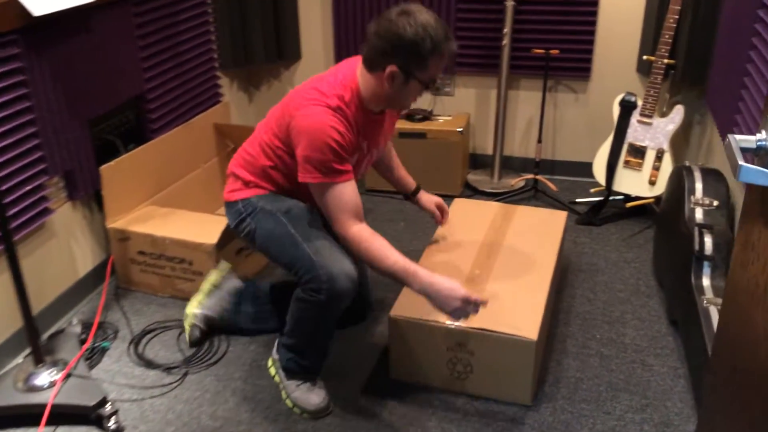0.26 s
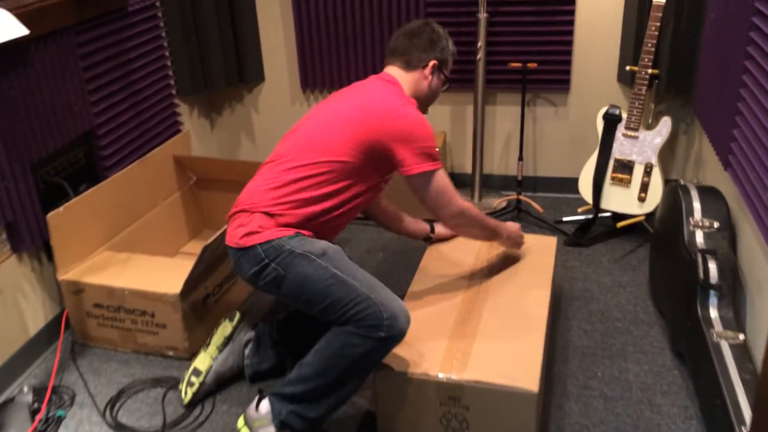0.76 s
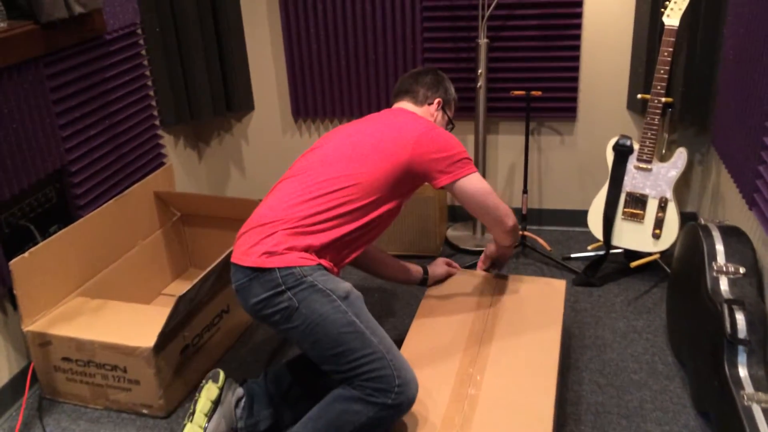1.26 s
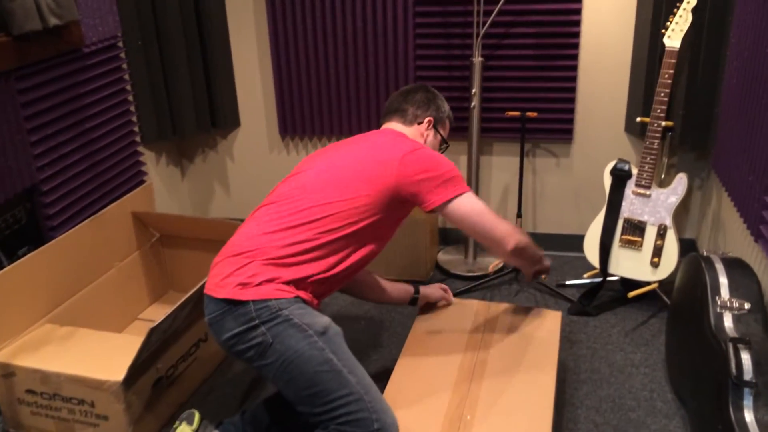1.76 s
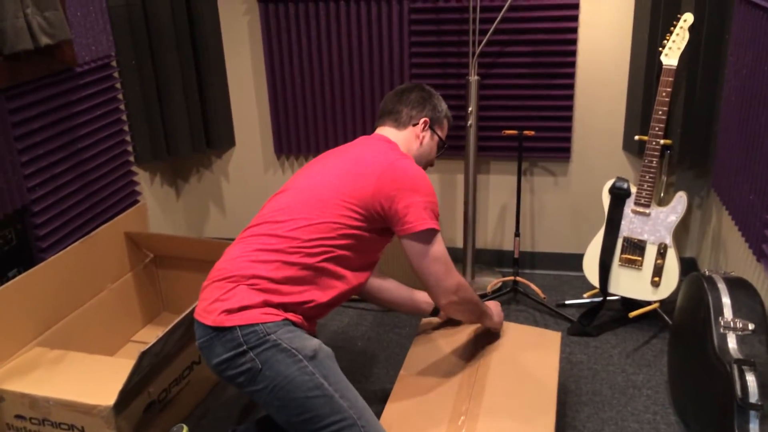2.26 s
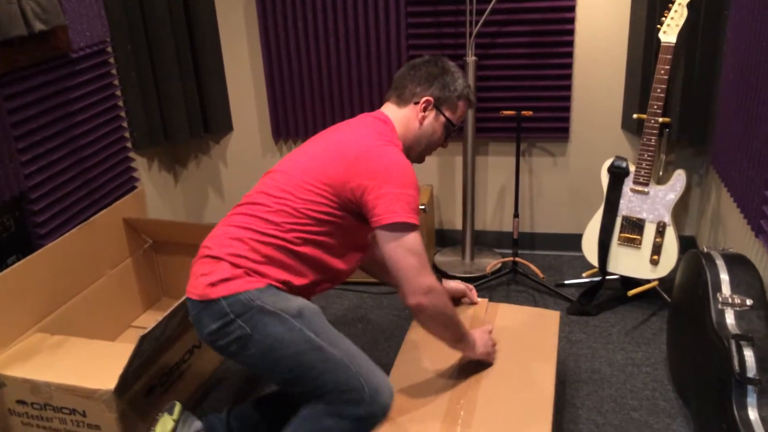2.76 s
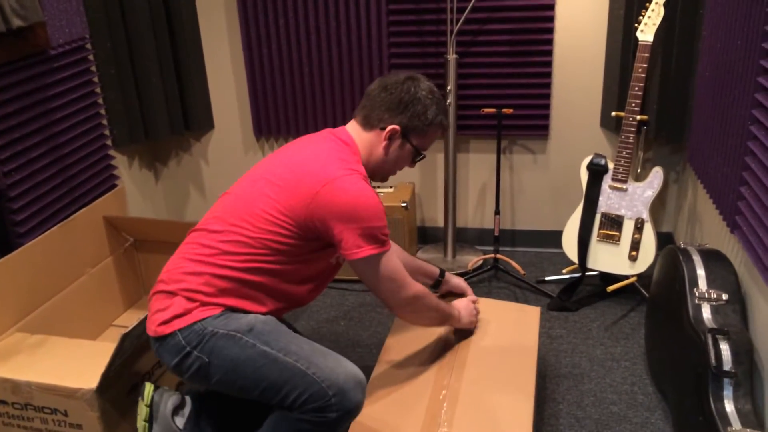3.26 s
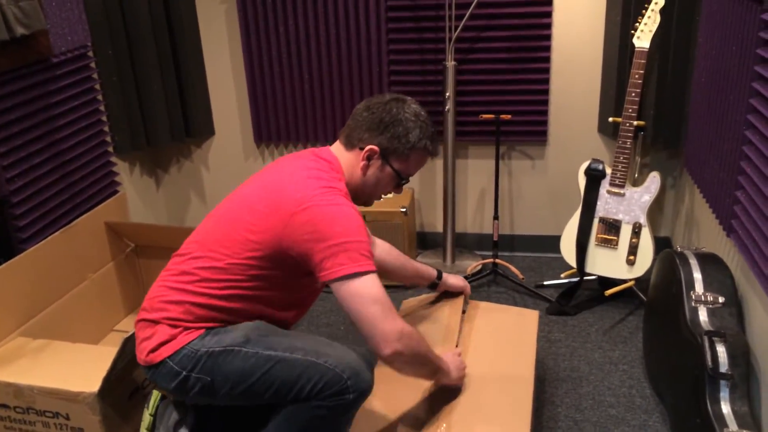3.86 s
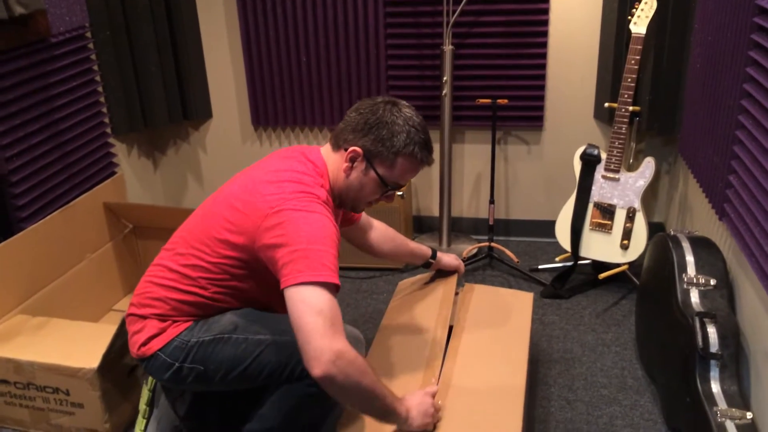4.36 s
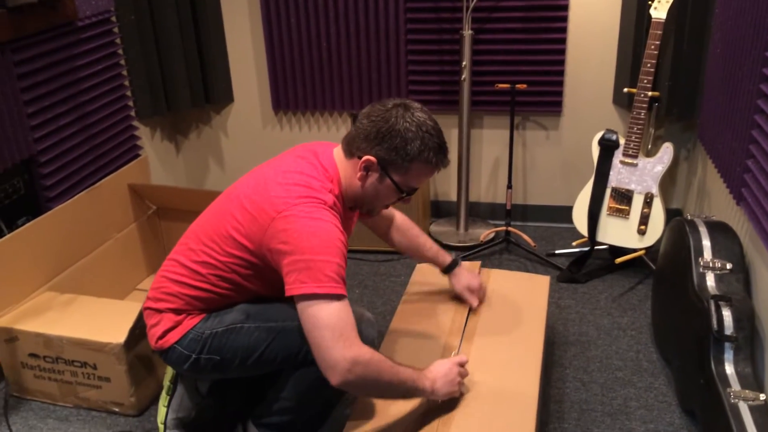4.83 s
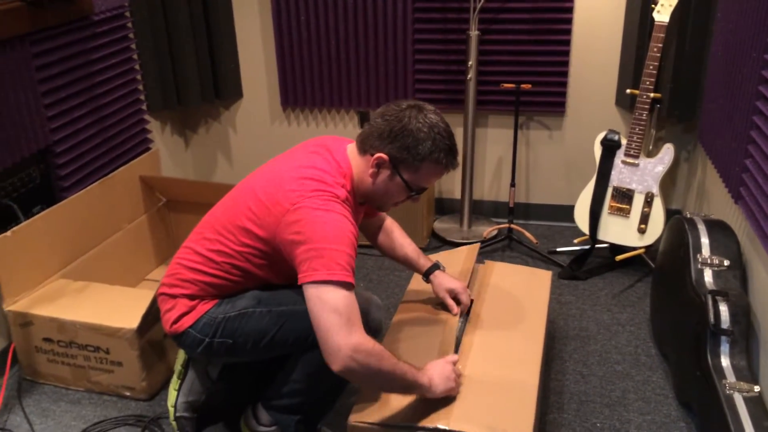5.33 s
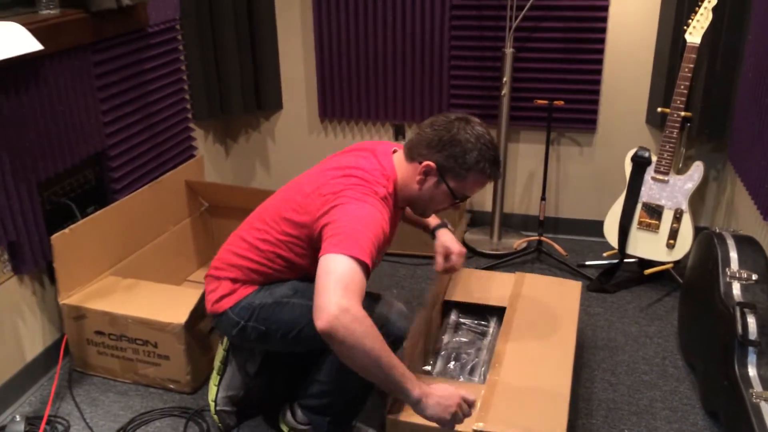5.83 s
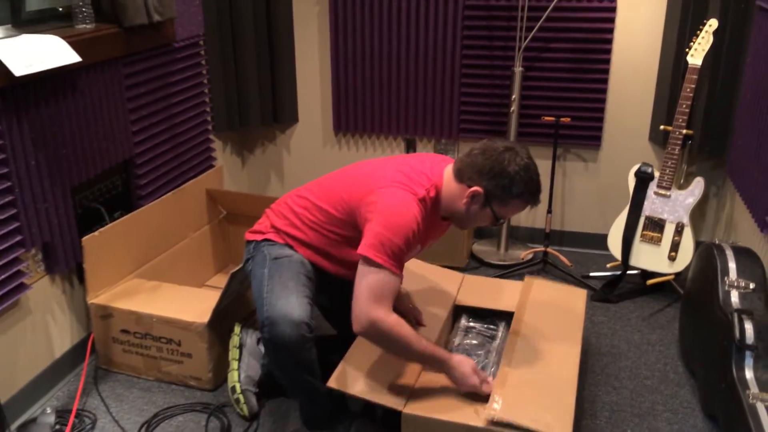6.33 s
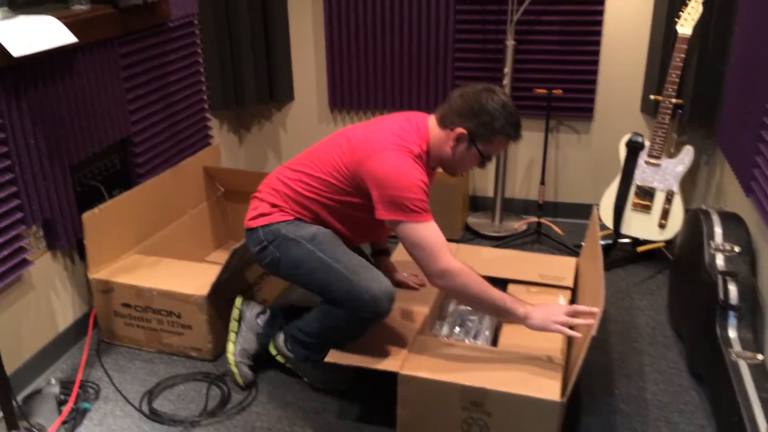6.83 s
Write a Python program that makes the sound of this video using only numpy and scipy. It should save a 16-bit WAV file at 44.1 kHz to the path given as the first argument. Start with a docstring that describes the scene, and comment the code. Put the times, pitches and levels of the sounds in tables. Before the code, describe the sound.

In a quiet padded room, packing tape snaps and scrapes under a knife before two hard pops and thumps open a cardboard carton.

```python
"""A cardboard box in a small, padded room: hands bump and stroke the board, then fibres and tape snap.
From 3.3 to 4.5 s a knife slits the taped seam; the flaps are then pulled open with hard snaps and pushes,
and strokes go on to the end. Snaps and scuffs are grain noise, rubbing is dense slips through resonances,
pushes are sagging sines in a hollow box and knocks are ringing board modes. A small microphone hears
the box over faint reflections and still air."""
import sys
import numpy as np
from scipy import signal
from scipy.fft import rfft, irfft
from scipy.io import wavfile

SR = 44100
rng = np.random.default_rng(int(sys.argv[2]) if len(sys.argv) > 2 else 0)


def wav_out(sig):
    """Save sig, one row per channel (or a flat mono array), as 16-bit PCM at SR to the path in sys.argv[1]."""
    wavfile.write(sys.argv[1], SR, np.round(np.clip(np.atleast_2d(sig).T, -1, 1) * 32767).astype(np.int16))


N = 312752

# resonances of the hollow box: mode_hz, width_hz, relative level_db
BOX_MODES = [(73, 20, -1), (127.4, 36.6, -1), (163, 16.6, -1.5), (187, 28.7, 1), (219, 57.4, -6.5)]
# resonances of the corrugated board: mode_hz, width_hz, relative level_db
BOARD_MODES = [(284, 88, 6.5), (434, 88, -2.5), (560, 380, -2.5), (686, 70, -6), (1026, 630, -10.5),
               (1380, 70, -11.5), (1400, 100, -13.5), (1810, 270, -12), (2300, 120, -16.5),
               (2640, 54, -21.5)]
SLIT_FROM_S, SLIT_TO_S = 3.33, 4.46   # the blade runs along the seam


def from_db(db):
    """Decibels to gain."""
    return 10 ** (np.asarray(db) / 20)


def rms_one(x):
    """Scales x to rms 1."""
    return x / np.sqrt(np.mean(x ** 2) + 1e-20)


def at_hz(points, hz):
    """Reads a table on a log-frequency axis."""
    points = np.array(points)
    return np.interp(np.log(hz), np.log(points[:, 0]), points[:, 1])


def drift(rate_hz):
    """Slow chance of spread 1: noise through a double one-pole low-pass."""
    r = np.exp(-2 * np.pi * rate_hz / SR)
    noise = rng.standard_normal(N + SR)
    return rms_one(signal.lfilter([1], [1, -2 * r, r * r], noise)[SR:])   # first second settles


def envelope(t, swell_s, t60_s):
    """Straight swell, then exponential decay."""
    swell = np.minimum(t / max(swell_s, 1e-4), 1)
    return swell * from_db(-60 * np.maximum(t - swell_s, 0) / max(t60_s, .01))


def colour(x, spectrum):
    """Shapes x by a spectrum; white noise of rms 1 keeps rms 1."""
    gain = from_db(at_hz(spectrum, np.linspace(1, SR / 2, N // 2 + 1)))
    return irfft(rfft(x) * rms_one(gain), N)


def resonate(x, modes, between_db):
    """Parallel resonances of alternating sign over a broad band; white noise of rms 1 keeps rms 1."""
    impulse = np.arange(N) == 0   # filtered alongside x to find the power gain
    probe = np.stack([x, impulse])
    edges_hz = [0.53 * modes[0][0], 1.16 * modes[-1][0]]
    band = signal.butter(2, edges_hz, "band", fs=SR, output="sos")
    out = from_db(between_db) * signal.sosfilt(band, probe)
    for k, (hz, width_hz, level_db) in enumerate(modes):
        r = np.exp(-np.pi * width_hz / SR)
        top = (-1) ** k * from_db(level_db) * (1 - r * r) / 2
        poles = [1, -2 * r * np.cos(2 * np.pi * hz / SR), r * r]
        out += signal.lfilter([top, 0, -top], poles, probe + 1e-18)
    return out[0] / np.sqrt(np.sum(out[1] ** 2))


def grains(per_s, spread_db):
    """Random tiny slips of uneven size and either sign; rms 1."""
    size_db = spread_db * np.minimum(rng.exponential(1, N), 5)
    sizes = from_db(size_db) * rng.choice([-1, 1], N)
    return rms_one(sizes * (rng.random(N) < per_s / SR))


def still_air():
    """The quiet room: coloured noise whose level drifts slightly."""
    # spectrum of the room tone: hz, relative level_db (per Hz)
    tone_spectrum = [(15, -8), (25, 12), (53, 8.5), (82, 6.5), (198, -7), (377, -9), (700, -14.5),
                     (868, -24), (1450, -16.5), (2110, -23.5), (7260, -25.5), (11500, -29.5), (15400, -28)]
    level_db = -59.5 + 0.27 * drift(3.0)
    return from_db(level_db) * colour(rng.standard_normal(N), tone_spectrum)


def room(x):
    """Dense reflections, each octave of noise dying at its own rate, the top ones soonest."""
    # decay of the padded room: hz, t60_s
    room_decay = [(100, 0.14), (1000, 0.15), (10000, 0.036)]
    t, tail = np.arange(SR // 2) / SR, 0
    for low_hz in 60 * 2. ** np.arange(8):
        band = signal.butter(2, [low_hz, 2 * low_hz], "band", fs=SR, output="sos")
        t60_s = at_hz(room_decay, np.sqrt(2) * low_hz)
        tail = tail + signal.sosfilt(band, rng.standard_normal(len(t))) * from_db(-60 * t / t60_s)
    tail = tail * (t > .004)   # reflections start 4 ms after the direct sound
    return signal.fftconvolve(x, tail / np.sqrt(np.sum(tail ** 2)))[:N]


def drumming():
    """The pushed panel swells and dies at its own sagging pitch; the whole box joins in."""
    # pushes that set a panel drumming: start_s, level_db (peak), panel_hz (at the start), t60_s
    push_table = [(0.207, -33, 132, 0.053), (0.223, -28, 172, 0.049), (0.464, -41, 69, 0.049),
                  (1.314, -37, 118, 0.038), (1.497, -26, 194, 0.086), (1.509, -23, 192, 0.062),
                  (1.548, -36, 184.4, 0.32), (1.635, -25, 200.3, 0.12), (1.825, -41.5, 183, 0.02),
                  (2.49, -22.5, 158, 0.1), (2.527, -34, 109, 0.1), (2.742, -38, 171.7, 0.39),
                  (2.807, -34.5, 168, 0.17), (2.86, -48, 168, 0.1), (2.933, -36.5, 129, 0.054),
                  (3.213, -42, 164, 0.18), (3.401, -26, 141, 0.028), (3.523, -30, 179, 0.031),
                  (3.569, -32.5, 168, 0.077), (3.753, -34.5, 209.6, 0.3), (3.809, -23.5, 194.2, 0.11),
                  (3.992, -35.5, 84, 0.081), (4.029, -42, 79.4, 0.17), (4.231, -38, 203, 0.062),
                  (4.275, -36, 204, 0.19), (4.892, -36.5, 226, 0.13), (5.041, -37.5, 219, 0.072),
                  (5.3, -33, 201, 0.25), (5.363, -18.5, 197.3, 0.061), (5.615, -14.5, 156.6, 0.12),
                  (5.628, -9, 174.7, 0.043), (5.665, -27.5, 130, 0.22), (5.946, -29, 172, 0.026),
                  (5.967, -31.5, 202, 0.02), (6.07, -34.5, 182.6, 0.11), (6.385, -39, 112, 0.21),
                  (6.42, -36, 113, 0.14), (6.549, -39, 137.6, 0.092)]
    swell_s = 0.0095
    panels, shake, t = np.zeros(N), np.zeros(N), np.arange(SR // 2) / SR
    for (start_s, level_db, panel_hz, t60_s), turn in zip(push_table, rng.random(len(push_table))):
        at = round(start_s * SR)
        rise = np.sin(np.pi / 2 * np.minimum(t / swell_s, 1)) ** 2
        decay = from_db(-60 * (np.maximum(t - swell_s, 0) / max(t60_s, .02)) ** 1.36)
        shape = from_db(level_db) * rise * decay
        cycles = panel_hz * t * (1 - 0.33 * t) + turn   # pitch sags by 66 % of its start per second
        panels[at:at + len(t)] += (shape * np.sin(2 * np.pi * cycles))[:N - at]
        shake[at:at + len(t)] += shape[:N - at]
    shake = shake * rng.standard_normal(N)
    hollow = from_db(-10) * resonate(shake, BOX_MODES, between_db=-15)
    flaps = from_db(-22.5) * resonate(shake, BOARD_MODES[:4], between_db=-27)   # they rattle along
    return panels + hollow + flaps


def knocks():
    """A short blow sets the board modes near its pitch ringing freely, the high ones dying first."""
    # knuckle or flap on the board: start_s, level_db (peak of the ringing), pitch_hz, t60_s (at that pitch)
    knock_table = [(0.211, -26.5, 920, 0.039), (6.275, -27.5, 432, 0.064)]
    out, t = np.zeros(N), np.arange(SR // 4) / SR
    start_turns = rng.random((len(knock_table), len(BOARD_MODES)))
    for (start_s, level_db, pitch_hz, t60_s), turns in zip(knock_table, start_turns):
        rings = np.zeros(len(t))
        for (hz, *_), turn in zip(BOARD_MODES, turns):
            gain = from_db(-9 * abs(np.log2(hz / pitch_hz)))   # 9 dB less per octave away
            ringing = envelope(t, .001, t60_s * pitch_hz / hz)
            rings += gain * ringing * np.sin(2 * np.pi * (hz * t + turn))
        click = 0.16 * envelope(t, 0.00018, 0.024) * rng.standard_normal(len(t))
        at = round(start_s * SR)
        out[at:at + len(t)] += from_db(level_db) * (rings / np.abs(rings).max() + click)
    return out


def pressure(now):
    """Each stroke is one arch of pressure; gains of hiss and scrape, strokes adding in power."""
    # blade and hands over the board: start_s, length_s, hiss_db (surface), scrape_db (board, over the hiss)
    stroke_table = [(-.06, 0.094, -47, -4), (0.259, 0.11, -67, 3), (0.332, 0.28, -70, 3),
                    (0.673, 0.4, -69.5, 3.5), (1.114, 0.49, -69.5, 2.5), (1.436, 0.27, -53, 1),
                    (1.81, 0.36, -63.5, -4), (2.078, 0.28, -67.5, 1), (2.477, 0.21, -51.5, -3),
                    (2.651, 0.15, -58.5, -2.5), (2.773, 0.3, -57, 2.5), (3.062, 0.49, -66, 1.5),
                    (3.34, 0.18, -63, 11), (3.62, 0.57, -55.5, 0.5), (3.954, 0.6, -53, -3),
                    (4.169, 0.21, -55.5, 7.5), (4.404, 0.32, -72, -1), (4.667, 0.63, -56.5, -6),
                    (5.13, 0.48, -66.5, 2.5), (5.383, 0.28, -49, -0.5), (5.646, 0.26, -66, -7),
                    (6.0, 0.29, -59, -3.5), (6.23, 0.6, -58.5, -3.5), (6.787, 0.24, -51, -3),
                    (6.908, 0.27, -50, -7)]
    peak_at, sharpness = 0.38, 0.92   # share of the length at full pressure; power of the arch
    hiss, scrape = np.zeros(N), np.zeros(N)
    bend = np.log(.5) / np.log(peak_at)
    for start_s, length_s, hiss_db, scrape_db in stroke_table:
        progress = np.clip((now - start_s) / length_s, 0, 1)
        arch = np.abs(np.sin(np.pi * progress ** bend)) ** sharpness
        hiss += (from_db(hiss_db) * arch) ** 2
        scrape += (from_db(hiss_db + scrape_db) * arch) ** 2
    return np.sqrt(hiss), np.sqrt(scrape)


def wandering(x, modes, between_db):
    """Resonances that each swell and fade on their own while the contact point travels."""
    power = sum(width_hz * from_db(2 * level_db) for _, width_hz, level_db in modes)
    voices = np.zeros(N)
    for mode in modes:
        _, width_hz, level_db = mode
        share = np.sqrt(width_hz / power) * from_db(level_db)
        sway = rms_one(from_db(5 * drift(6.0)))   # 5 dB spread
        voices += share * resonate(x * sway, [mode], between_db=-40)
    return .8 * voices + .6 * resonate(x, modes, between_db)


def rubbing():
    """Dense slips hiss on the surface, ring in board or tape and shake the box; the grip wavers."""
    # level of the box rumble: time_s, level_db
    rumble_level = [(0.0, -63.5), (1.26, -64.5), (1.56, -46), (1.89, -66), (2.53, -66), (2.71, -57),
                    (3.16, -59.5), (3.71, -44.5), (3.83, -59), (4.27, -54), (4.6, -55.5), (5.33, -57),
                    (5.53, -44.5), (6.0, -56), (6.87, -63.5), (7.09, -81)]
    # resonances of the taut tape: mode_hz, width_hz, relative level_db
    seam_modes = [(560, 88, 3), (1200, 80, 7), (1530, 420, -6), (1450, 70, 9), (2620, 140, 3.5)]
    # spectrum of the surface hiss: hz, relative level_db (per Hz)
    hiss_spectrum = [(1530, -59), (2600, -14), (2830, -36), (3680, 3), (4060, 1), (7100, 4), (14700, -6.5),
                     (15800, -5)]
    now = np.arange(N) / SR
    hiss_gain, scrape_gain = pressure(now)
    rumble_gain = from_db(np.interp(now, *np.transpose(rumble_level)))
    rumble_gain = rumble_gain + from_db(-1) * hiss_gain   # the box shakes under a stroke

    grip = from_db(1.5 * drift(25.0))
    slips = grains(7700.0, spread_db=0.5)
    slips = slips + .4 * grains(110.0, spread_db=3.5)   # now and then a fibre cracks
    hiss = colour(hiss_gain * grip * slips, hiss_spectrum)

    scrape = scrape_gain * grip * slips
    slitting = (now > SLIT_FROM_S) & (now < SLIT_TO_S)
    on_board = wandering(scrape * ~slitting, BOARD_MODES, between_db=-4)
    on_tape = resonate(scrape * slitting, seam_modes, between_db=-4)

    shaking = rumble_gain * from_db(2.67 * drift(8.2)) * rng.standard_normal(N)
    rumble = resonate(shaking, BOX_MODES, between_db=-29.5)
    return hiss + on_board + on_tape + rumble


def tear(bursts):
    """Bursts of tiny tears crack in the air and shake the board; modes near their pitch ring most."""
    # spectrum of the crack: hz, relative level_db (per Hz)
    crack_spectrum = [(1530, -24), (2600, -8.5), (3240, 6), (6630, 5.5), (9820, -2), (10800, 0),
                      (15000, -8), (15800, -14)]
    bright, airy, board = np.zeros(N), np.zeros(N), np.zeros((len(BOARD_MODES), N))
    mode_hz = np.array(BOARD_MODES)[:, :1]
    for start_s, level_db, tearing, airy_db, board_db, pitch_hz, shaking in bursts:
        at = round(start_s * SR)
        span = slice(at, at + len(tearing))
        bright[span] += from_db(level_db - 14) * tearing   # noise peaks stand well above its rms
        airy[span] += from_db(level_db - 7.5 + airy_db) * tearing
        near = from_db(board_db - 10.8 * np.abs(np.log2(mode_hz / pitch_hz)))
        board[:, span] += near * shaking ** ((mode_hz / 1000) ** 0.25)   # high modes die first
    tears = grains(9000.0, spread_db=3.2)
    low = signal.butter(2, 9000, "low", fs=SR, output="sos")
    high = signal.butter(2, 9000, "high", fs=SR, output="sos")
    crack = signal.sosfilt(low, bright * tears) - signal.sosfilt(high, airy * tears)
    out = colour(crack, crack_spectrum)
    for mode, drive in zip(BOARD_MODES, board):
        out += from_db(mode[2]) * resonate(drive * tears, [mode], between_db=-30.5)
    return out


def scuffs():
    """Short scuffs of a hand or flap: tears that swell and die."""
    # start_s, level_db (bright part), board_db, pitch_hz (board), swell_s, t60_s (board: at 1 kHz)
    scuff_table = [(0.4094, -58, -56.5, 940, 0.014, 0.086), (0.483, -64, -54.5, 1860, 0.0099, 0.47),
                   (1.43, -41, -58, 473, 0.0084, 0.18), (2.8135, -72, -40.5, 1890, 0.021, 0.18),
                   (5.287, -38, -41, 1278, 0.036, 0.11), (5.5647, -30.5, -40, 1400, 0.0035, 0.15),
                   (5.831, -60, -48.5, 660, 0.011, 0.069), (6.034, -36, -54, 1680, 0.018, 0.049),
                   (6.1396, -35.5, -58.5, 560, 0.013, 0.15), (6.754, -45, -50.5, 2040, 0.018, 0.14),
                   (6.8325, -37, -46.5, 1037, 0.013, 0.41)]
    t, bursts = np.arange(SR // 4) / SR, []
    for start_s, level_db, board_db, pitch_hz, swell_s, t60_s in scuff_table:
        shape = envelope(t, swell_s, t60_s)
        bursts.append((start_s, level_db, shape, -3, board_db, pitch_hz, shape))
    return tear(bursts)


def snaps():
    """Tape and fibres snap: a tick, then a dying spray of smaller tears."""
    # start_s, level_db (tick), board_db, pitch_hz (board), t60_s (spray; board: at 1 kHz)
    snap_table = [(0.6226, -45, -60, 700, 0.15), (0.8485, -39, -61, 436, 0.2),
                  (1.4724, -31.5, -48.5, 590, 0.25), (1.4907, -16.5, -29.5, 1540, 0.12),
                  (1.5658, -18.5, -76, 418, 0.34), (1.6426, -17, -22.5, 2070, 0.073),
                  (1.831, -54, -48.5, 1340, 0.071), (1.894, -39, -49.5, 2720, 0.4),
                  (2.187, -58, -55.5, 1540, 0.14), (2.4921, -22.5, -24, 990, 0.028),
                  (2.4961, -21.5, -26, 440, 0.085), (2.508, -18, -55, 486, 0.056),
                  (2.5518, -37, -45.5, 765, 0.18), (2.6772, -33, -51, 754, 0.017),
                  (2.885, -43, -58, 680, 0.013), (2.904, -25.5, -47, 384, 0.022),
                  (3.1488, -49, -54, 680, 0.11), (3.3481, -29, -30.5, 2700, 0.34),
                  (3.396, -34, -40, 444, 0.16), (3.4489, -42, -34, 1370, 0.072),
                  (3.463, -19.5, -37, 1350, 0.096), (3.5104, -29, -36, 1210, 0.29),
                  (3.5404, -21, -57, 1370, 0.03), (3.6357, -23.5, -32.5, 1400, 0.1),
                  (3.6651, -26, -41.5, 1520, 0.13), (3.7222, -30, -43, 1460, 0.025),
                  (3.7477, -25.5, -54, 354, 0.39), (3.7955, -33, -47.5, 655, 0.28),
                  (3.8586, -25, -43.5, 1300, 0.099), (3.9085, -29.5, -46, 1420, 0.12),
                  (3.9418, -27, -35, 1400, 0.024), (3.9677, -23.5, -40, 1470, 0.16),
                  (4.4508, -34.5, -46, 1400, 0.072), (5.3608, -2, -19, 1380, 0.12),
                  (5.372, -17, -28.5, 695, 0.061), (5.3844, -8, -33.5, 550, 0.074),
                  (5.415, -43, -34.5, 1030, 0.099), (5.497, -27, -46, 1220, 0.11),
                  (5.525, -24.5, -61, 1280, 0.089), (5.5992, -22.5, -38, 1400, 0.18),
                  (5.614, -4, -23.5, 626, 0.067), (5.7754, -45, -60.5, 353, 0.076),
                  (6.0183, -39.5, -60, 960, 0.3), (6.5433, -38, -59, 815, 0.029),
                  (6.787, -26, -62, 1450, 0.31)]
    spray_db = -10   # over the tick
    top_octave_db, top_octave_slit_db = -3.5, -44   # shift above 9 kHz; duller under the blade
    t, bursts = np.arange(SR // 4) / SR, []
    tick = envelope(t, .0003, .009)
    for start_s, level_db, board_db, pitch_hz, t60_s in snap_table:
        tearing = tick + from_db(spray_db) * envelope(t, 0.0013, t60_s)
        airy_db = top_octave_slit_db if SLIT_FROM_S < start_s < SLIT_TO_S else top_octave_db
        shaking = envelope(t, 0.00074, t60_s)
        bursts.append((start_s, level_db, tearing, airy_db, board_db, pitch_hz, shaking))
    return tear(bursts)


def scene():
    """Box sounds, their reflections and the still air of the room."""
    box = drumming() + knocks() + rubbing() + scuffs() + snaps()
    return (box + from_db(-15.0) * room(box) + still_air())[None]


def record(dry):
    """The small microphone drops the deepest bass; peaks are rounded and the top is cut."""
    peak_top, cutoff_hz = .55, 16200   # height that peaks are rounded towards; 70 dB down from here up
    bass_cut = signal.butter(2, 30.0, "high", fs=SR, output="sos")
    thin = signal.sosfilt(bass_cut, dry)
    rounded = peak_top * np.tanh(thin / peak_top)
    top_cut = signal.cheby2(12, 70, cutoff_hz, fs=SR, output="sos")
    return signal.sosfilt(top_cut, rounded)


dry = scene()
out = record(dry)
wav_out(out)
```